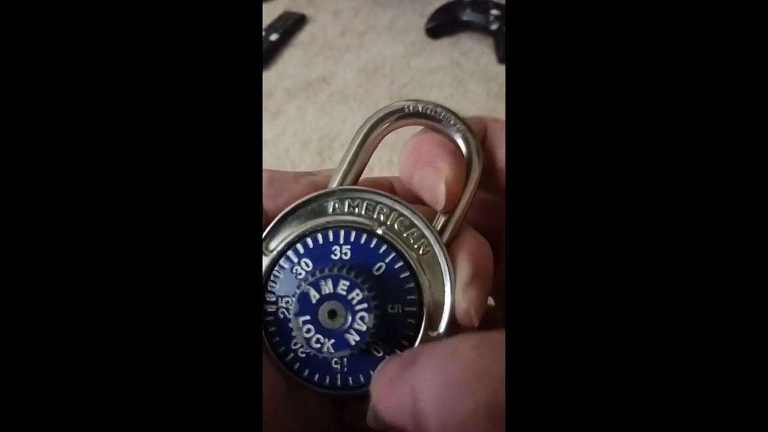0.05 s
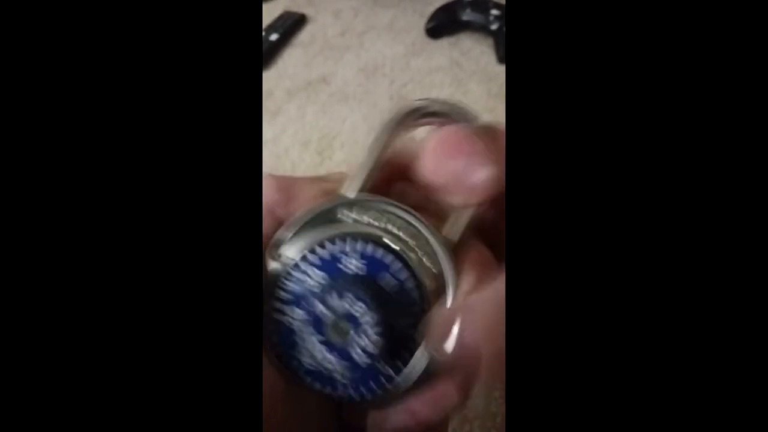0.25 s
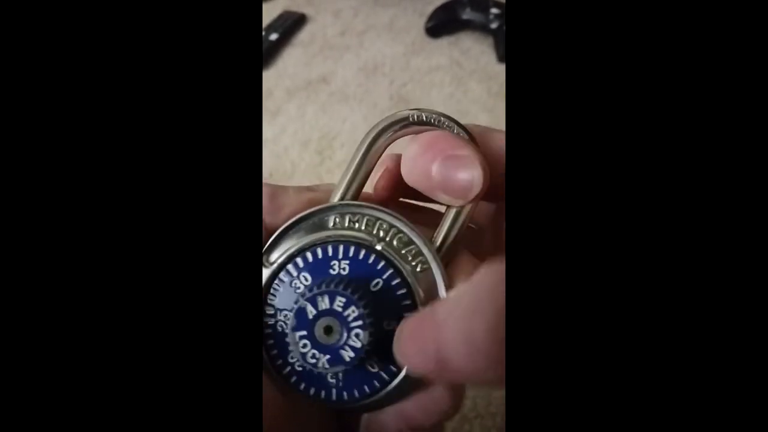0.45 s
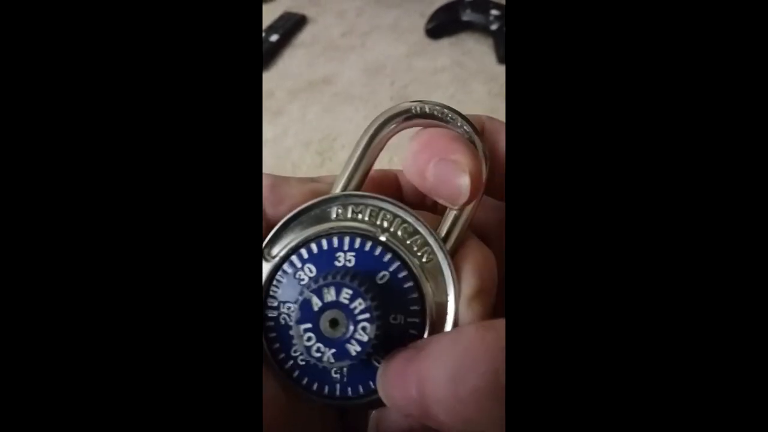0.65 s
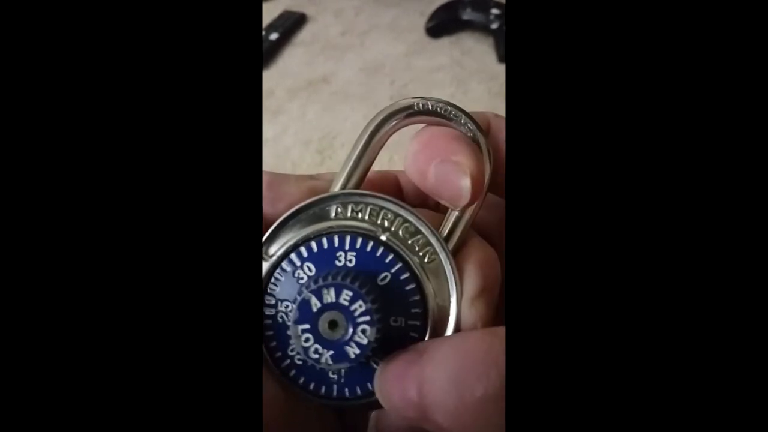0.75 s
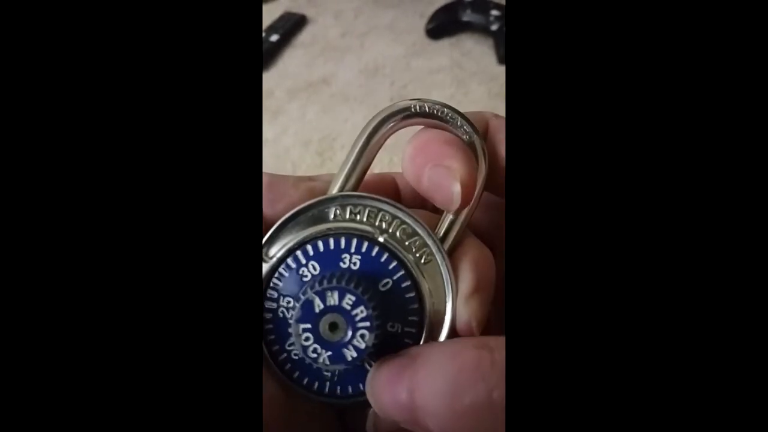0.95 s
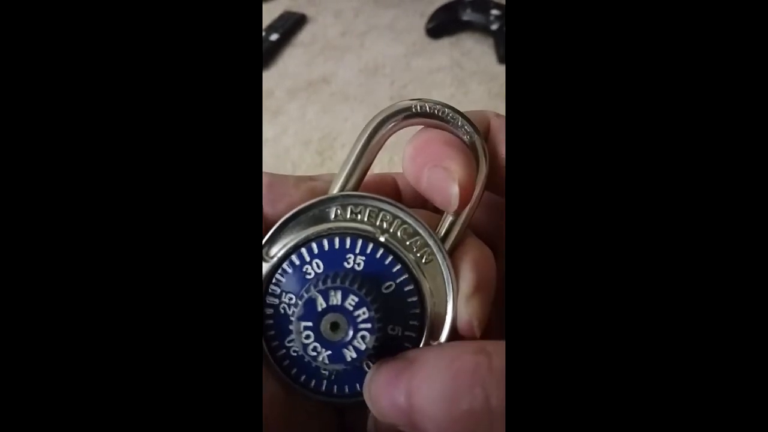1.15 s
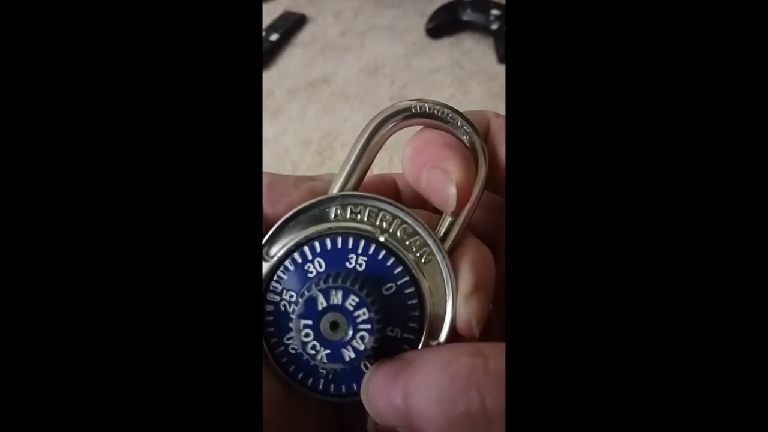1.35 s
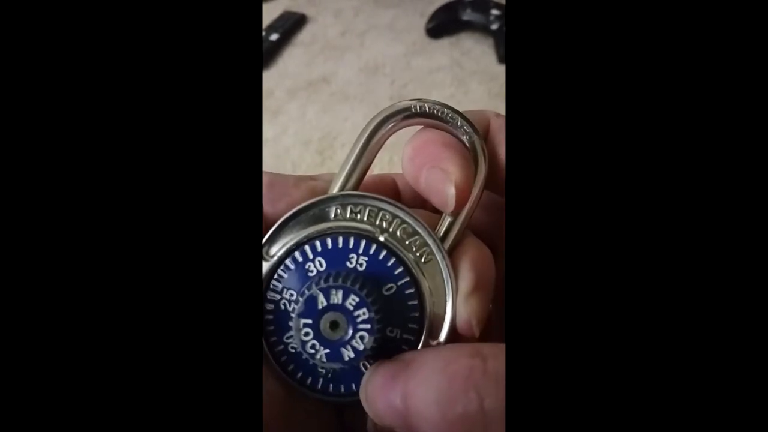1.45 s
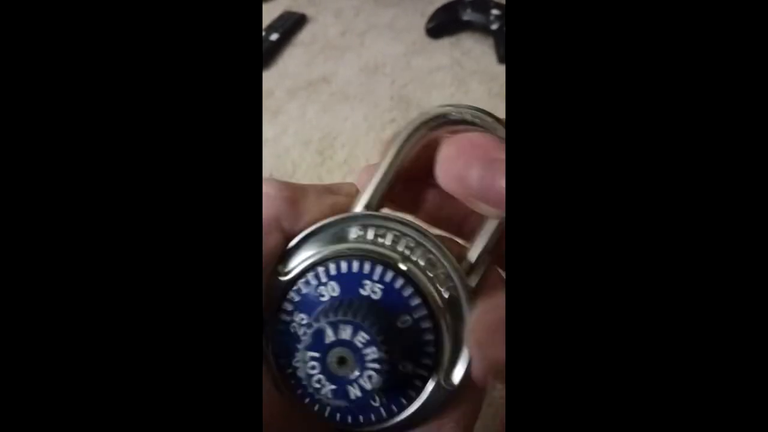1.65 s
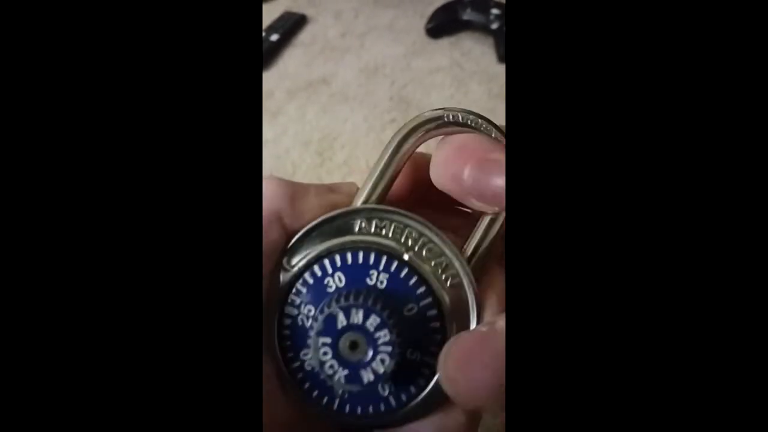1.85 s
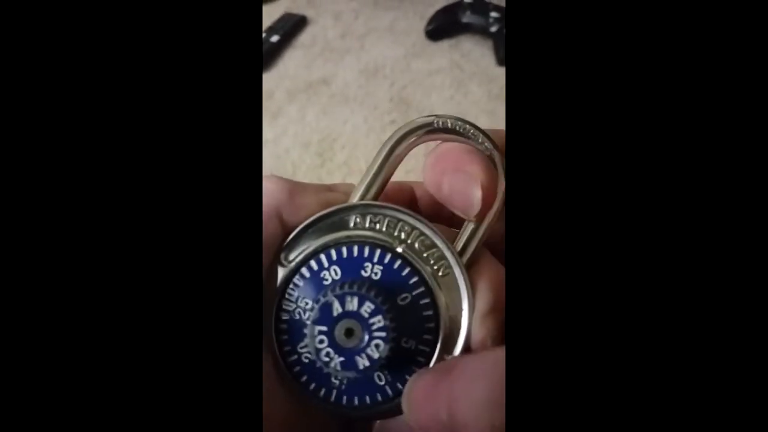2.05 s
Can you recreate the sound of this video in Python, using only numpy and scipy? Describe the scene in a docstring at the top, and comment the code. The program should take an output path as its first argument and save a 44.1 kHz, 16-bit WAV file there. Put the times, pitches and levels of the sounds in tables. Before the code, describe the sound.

A combination padlock is tugged, its shackle clacking sharply against the latch, then slipping back with a short metallic rasp. After a pause it happens again, close to the microphone in a small quiet room.

```python
"""Hard steel clacks, then a short rasp, twice over: a combination padlock close by in a small quiet room.
Its shackle is tugged against the latch, then slips back in jerks.
Each contact sounds the case, which the hand damps at once; shackle and spring ring on faintly.
Underneath are a low throbbing hum, faint hiss and fingers rubbing on the case."""
import sys
import numpy as np
from scipy import signal
from scipy.fft import rfft, irfft
from scipy.io import wavfile

SR = 44100
rng = np.random.default_rng(int(sys.argv[2]) if len(sys.argv) > 2 else 0)


def output_pcm(signal):
    """Save a mono or channel-first signal as 16-bit PCM at the path in sys.argv[1].

    Samples are clipped to [-1, 1] before scaling.
    """
    pcm = np.clip(np.atleast_2d(signal).T, -1, 1) * 32767
    wavfile.write(sys.argv[1], SR, np.round(pcm).astype(np.int16))


N = 92610
T = np.arange(N) / SR
T_CONTACT = T[:1024]


def from_db(db):
    """Decibels to gain."""
    return 10 ** (np.asarray(db) / 20)


def unit(x):
    """Scale to unit energy."""
    return x / np.sqrt(np.sum(x ** 2, axis=-1, keepdims=True) + 1e-20)


def at_hz(points, hz):
    """Interpolate a table over log frequency."""
    f, v = np.transpose(points)
    return np.interp(np.log(np.maximum(hz, 1)), np.log(f), v)


def colour(x, spectrum):
    """Zero-phase filter from (frequency [Hz], gain [dB]) points."""
    size = x.shape[-1]
    return irfft(rfft(x) * from_db(at_hz(spectrum, np.fft.rfftfreq(size, 1 / SR))), size)


def fade(t, t60_s):
    """Exponential decay."""
    return np.exp(-np.log(1000) * t / t60_s)


def add(out, start_s, x):
    """Mix x into out."""
    i = int(start_s * SR)
    out[i:i + len(x)] += x[:N - i]


def minimum_phase(power):
    """Promptest impulse response with this power spectrum."""
    cepstrum = irfft(np.log(power + 1e-12) / 2)
    half = len(cepstrum) // 2
    cepstrum[1:half] *= 2
    cepstrum[half + 1:] = 0
    return irfft(np.exp(rfft(cepstrum)))


def air(level_db=-71.5, right_db=-3.5):
    """Still air: rumble alike in both channels, hiss nearly independent."""
    # noise spectrum (frequency [Hz], relative density [dB])
    spectrum = [(22, -28), (34, -22), (50, -5), (90, -9), (130, -13), (200, -24), (310, -25), (550, -35),
                (1500, -38), (5500, -43), (10000, -39), (14000, -32), (16000, -34)]
    # left-right likeness (frequency [Hz], correlation [-])
    likeness = [(60, .9), (300, .6), (1500, .1), (12000, .05)]
    alike = at_hz(likeness, np.fft.rfftfreq(N, 1 / SR))
    mid, side = rfft(rng.standard_normal((2, N)))
    noise = irfft(np.sqrt(1 + alike) * mid + np.sqrt(1 - alike) * side * [[1], [-1]], N)
    return unit(colour(noise, spectrum)) * np.sqrt(N) * from_db(level_db) * from_db([[0], [right_db]])


def hum(hz=50.2, beat_hz=10.5, peak_s=.052, tone_db=-65, waver_db=.8, right_db=-8):
    """Two close low tones beat; the level wavers slightly."""
    gain = from_db(tone_db + waver_db * signal.resample(rng.standard_normal(16), N))
    throb = 2 * np.cos(np.pi * beat_hz * (T - peak_s))
    return gain * throb * np.sin(2 * np.pi * (hz * T + rng.random())) * from_db([[0], [right_db]])


def fingers():
    """Skin rubs softly on the case as the grip shifts."""
    # rub envelope (time [s], level [dB])
    grip = [(0, -87.5), (.2, -94.5), (.45, -87.5), (.55, -105), (1.55, -105), (1.7, -104), (1.85, -84),
            (2.0, -82.5), (2.1, -88.5)]
    # rub spectrum (frequency [Hz], relative density [dB])
    spectrum = [(100, -31.5), (300, 2.5), (500, -1), (1000, -6), (3000, -18), (12000, -42.5)]
    rub = unit(colour(rng.standard_normal((2, N)), spectrum)) * np.sqrt(N)
    return rub * from_db(np.interp(T, *np.transpose(grip)))


def room(x, delay_s=.004, right_db=-5.5, early_db=3.5, early_t60_s=.06):
    """Strong early reflections, then a short diffuse tail that dies band by band."""
    # reverberation spectrum (frequency [Hz], gain [dB])
    spectrum = [(300, -4.5), (1000, -6.5), (2000, -14.5), (3500, -13), (5500, -21), (8500, -15.5),
                (12000, -18), (15500, -18.5)]
    # reverberation time (frequency [Hz], t60 [s])
    decay = [(500, .33), (3000, .37), (8000, .35), (15000, .32)]
    t, centres_hz = T[:SR // 2], np.geomspace(250, 16000, 7)
    white = rfft(rng.standard_normal((2, len(t))))
    hz = np.fft.rfftfreq(len(t), 1 / SR)
    tail = np.zeros((2, len(t)))
    for centre_hz, share in zip(centres_hz, np.eye(len(centres_hz))):
        band = irfft(white * at_hz(list(zip(centres_hz, share)), hz), len(t))
        tail += band * fade(t, at_hz(decay, centre_hz))
    tail *= 1 + from_db(early_db) * fade(t, early_t60_s)
    tail = colour(unit(tail), spectrum) * np.minimum(1, 10 * (t[-1] - t))
    tail = np.pad(tail, ((0, 0), (int(delay_s * SR), 0)))
    return signal.fftconvolve(x[None], tail, axes=1)[:, :N] * from_db([[0], [right_db]])


def direct(x, lag_s=.0003, scatter_db=-13.5, scatter_t60_s=.012):
    """Lock by the left port; the right hears it later, shaded and scattered off the hand."""
    # far-port shading (frequency [Hz], gain [dB])
    shade = [(500, -11), (1200, -4), (2300, -11), (3200, -11), (5500, -18), (9000, -10.5), (14000, -18)]
    scatter = unit(rng.standard_normal(len(T_CONTACT)) * fade(T_CONTACT, scatter_t60_s))
    far = colour(x, shade) + from_db(scatter_db) * signal.fftconvolve(x, scatter)[:N]
    return np.array([x, np.pad(far, (int(lag_s * SR), 0))[:N]])


def contact_force(chatter_s, chatter_ratio, graze_db=-9.5, graze_s=.001):
    """Steel grazes, strikes at the buffer's midpoint, then rebounds in tiny bounces."""
    before = np.exp(-T_CONTACT / graze_s)
    after = np.exp(-(T_CONTACT / chatter_s) ** 2)
    rebounds = chatter_ratio * unit(rng.standard_normal(len(T_CONTACT)) * after)
    rebounds[0] = 1   # the strike
    graze = from_db(graze_db) * unit(rng.standard_normal(len(T_CONTACT)) * before)[::-1]
    force = np.concatenate([graze, rebounds])
    window = np.sqrt(np.concatenate([before[::-1], after]))
    for _ in range(2):   # flatten the spectrum, keep the pulse brief
        force = irfft(np.exp(1j * np.angle(rfft(force)))) * window
    return force


def case(tint, crack_db, crack_low_hz=2597, body_low_hz=956, thud_db=-43, thud_hz=1200.6):
    """Impulse response: broad modes, a crack of dense overtones and a thud, tinted by contact point."""
    # hand-damped case modes (frequency [Hz], level [dB], t60 [s])
    case_modes = [(1000, -20.5, 0.026), (1850, -17.5, 0.0067), (2755, -9.5, .012), (3090, -10.5, .009),
                  (3850, -13.5, 0.021), (4382, -8.5, .008), (4864, -3.5, 0.013), (5206, -1.5, 0.0047),
                  (5780, -3.5, .006), (6600, -13, .005), (8870, -4.5, 0.0089), (9200, -8.5, .006),
                  (11910, -8.5, .005), (13400, -2.5, 0.015), (15000, -7.5, .004)]
    f = np.fft.rfftfreq(len(T_CONTACT), 1 / SR)
    modes = sum(from_db(db) ** 2 / (1 + (2 * np.pi * (f - hz) * t60_s / np.log(1000)) ** 2)
                for hz, db, t60_s in case_modes)
    crack = from_db(crack_db) ** 2 * f ** 6 / (f ** 6 + crack_low_hz ** 6)
    radiation = f ** 6 / (f ** 6 + body_low_hz ** 6)   # a small case radiates little bass
    thud = from_db(thud_db) ** 2 / (1 + (f / thud_hz) ** 2)
    return minimum_phase(((modes + crack) * radiation + thud) * from_db(at_hz(tint, f)) ** 2)


def ring(t, hz, t60_s, count=7, spread_hz=204):
    """A struck cluster of close partials that beat as they die."""
    partials_hz = hz + spread_hz * (np.linspace(-1, 1, count) + rng.uniform(-.85, 1, count) / count)
    partials = np.cos(2 * np.pi * partials_hz[:, None] * t) * fade(t, t60_s)
    return rng.choice([-1, 1], count) @ partials / np.sqrt(count)


def rattle(contacts, ring_modes, crack_db, chatter_ratio, click_gain_db=16.5):
    """Each contact sounds the case and leaves one part of the lock ringing."""
    out = np.zeros(N)
    tone = sum(from_db(db) * ring(T[:SR // 4], hz, t60_s) for hz, db, t60_s in ring_modes)
    for time_s, db, thud_db, body_db, ping_db, treble_db, chatter_s, ring_db in contacts:
        # contact colour (frequency [Hz], gain [dB])
        tint = [(1200.6, thud_db), (2800, body_db), (4730, 0), (9500, ping_db), (12500, treble_db)]
        click = unit(signal.fftconvolve(contact_force(chatter_s, chatter_ratio), case(tint, crack_db)))
        add(out, time_s - len(T_CONTACT) / SR, from_db(db + click_gain_db) * click)
        add(out, time_s, from_db(db + ring_db) * tone)
    return out


def padlock(crack_db):
    """Clacks on the latch ring the shackle; jerky slips back ring the spring."""
    # shackle strikes latch (time [s], relative level [dB], thud [dB], body [dB], ping [dB],
    # treble [dB], chatter length [s], ring [dB])
    clacks = [(.0575, -25.5, 1.5, 0.5, 11, 5.5, 0.0028, -20),
              (.2441, -22.5, -8.5, -1, 4.5, 3.5, 0.0036, -13.5),
              (.2491, -9, -10.5, -4.5, -1.5, -4.5, 0.0025, -18.5),
              (.2598, -21.5, -2.5, 7, 11, 1, .003, -16.5),
              (.2638, -14.5, -2.5, 0.5, 0.5, 1.5, 0.0054, -15.5),
              (.2671, -11.5, -1.5, -4.5, -3.5, -1, .001, -24),
              (.4145, -43.5, -3.5, -4.5, -8.5, -12, .002, -8), (.4174, -52, 5.5, 2, -1, -31, 0.0039, -9),
              (1.6016, -34.5, -23.5, -12, 4, -8.5, .002, -10), (1.6128, -47, 14, -10, 0, -7.5, .002, -10.5),
              (1.6191, -26.5, -10, -7, 6, -2.5, .003, 3.5), (1.6265, -9, 1, 8, 8.5, 7, .001, -5),
              (1.8432, -42, -17.5, -12, -1, -9.5, .001, -1.5)]
    # shackle slips back (columns as in clacks)
    slips = [(.4879, -32, -39, -10, -42, 2, 0.0015, -10), (.4911, -17.5, -3, -7.5, -2.5, 2.5, 0.0047, -34),
             (.4941, -24, 9.5, 5, 9.5, 14, 0.0019, 10), (.4971, -21, -4.5, -11.5, 2.5, -0.5, .003, -0.5),
             (1.8724, -29, 1.5, -48, -56, -5, 0.014, 11), (1.8781, -22, 1.5, -4.5, 2.5, 3.5, .003, -8),
             (1.8808, -18.5, 0.5, -8, 7, 4, 0.00073, -11),
             (1.8824, -24.5, -11.5, -2.5, -1.5, 4.5, 0.0095, 2.5)]
    # shackle modes (frequency [Hz], relative level [dB], t60 [s])
    shackle = [(2743, -29.5, .32), (4080, -43, 0.31)]
    # spring modes (frequency [Hz], relative level [dB], t60 [s])
    spring = [(4250, -30, 0.12), (9380, -31, 0.15)]
    tugs = rattle(clacks, shackle, crack_db, chatter_ratio=2)
    rasps = rattle(slips, spring, crack_db, chatter_ratio=4.3)
    return tugs + rasps


def scene():
    """Lock over background; the room hears it from all sides, so more overtones fill in between modes."""
    return direct(padlock(crack_db=-17.5)) + room(padlock(crack_db=-7.5)) + air() + hum() + fingers()


def record(dry, cutoff_hz=15900):
    """Steep low-pass."""
    return signal.sosfilt(signal.ellip(10, .2, 80, cutoff_hz, fs=SR, output="sos"), dry)


dry = scene()
out = record(dry)
output_pcm(out)
```